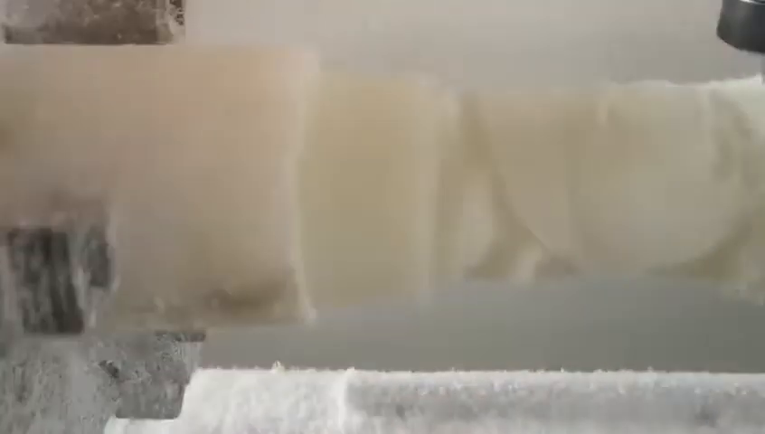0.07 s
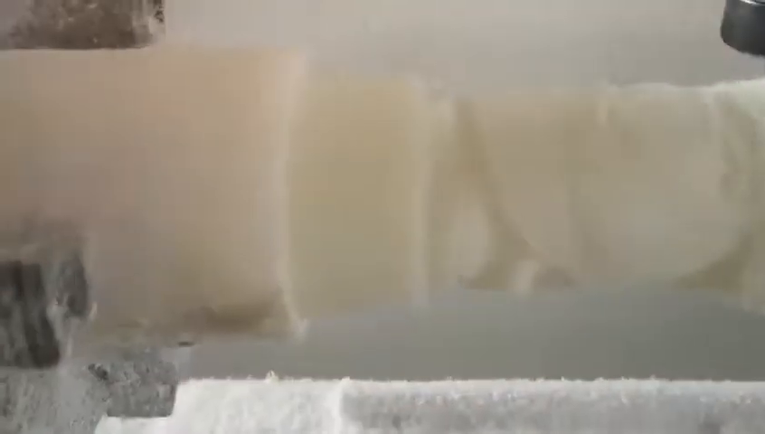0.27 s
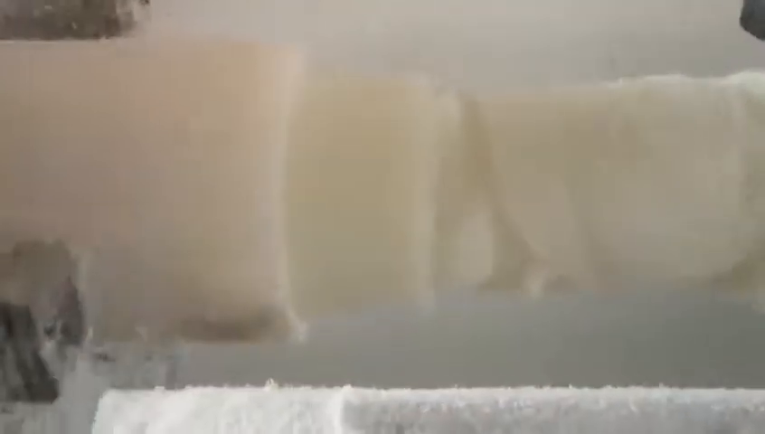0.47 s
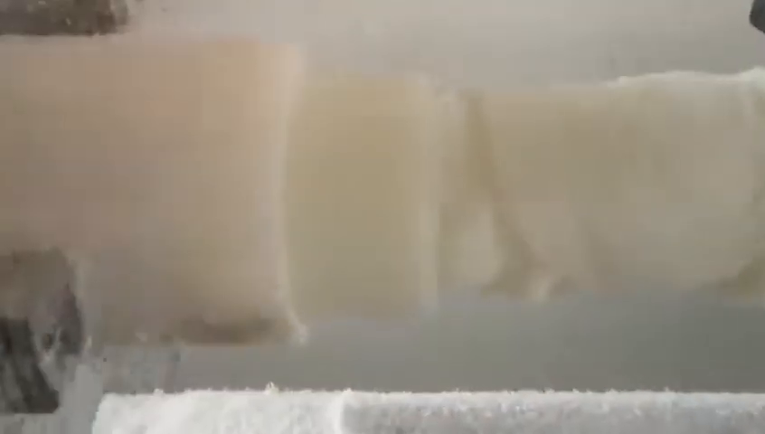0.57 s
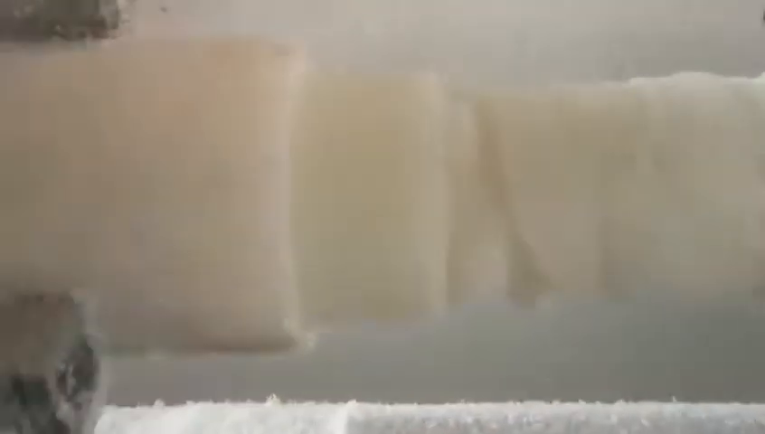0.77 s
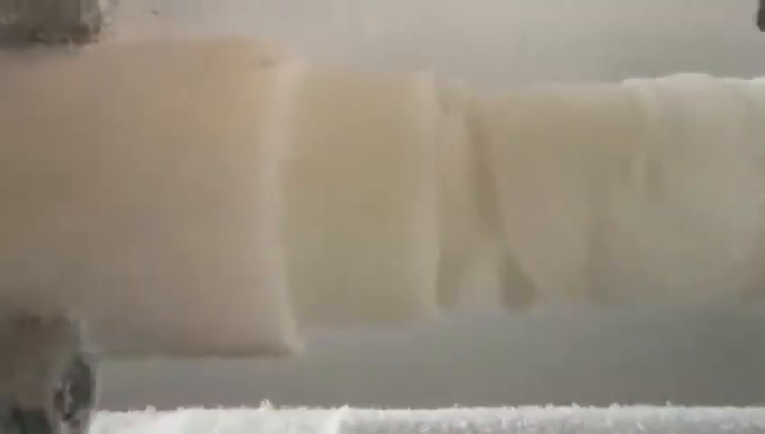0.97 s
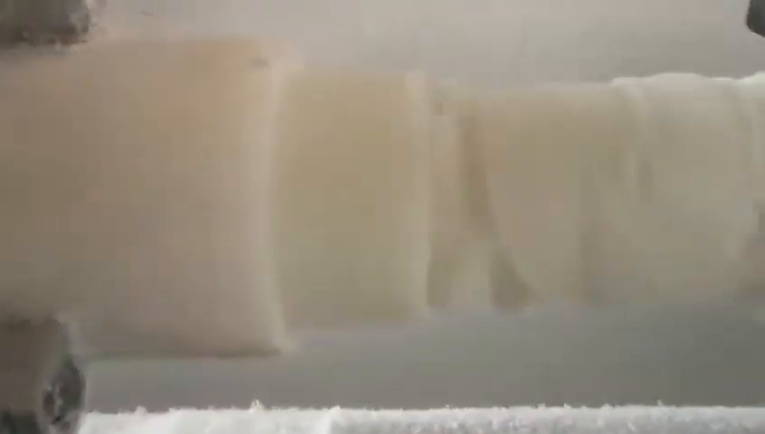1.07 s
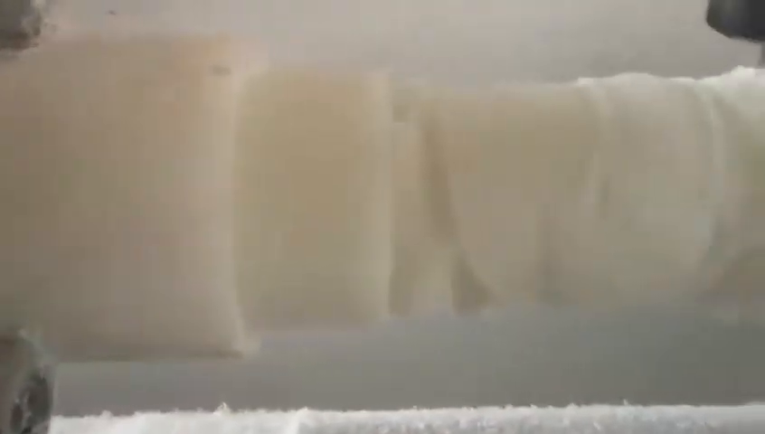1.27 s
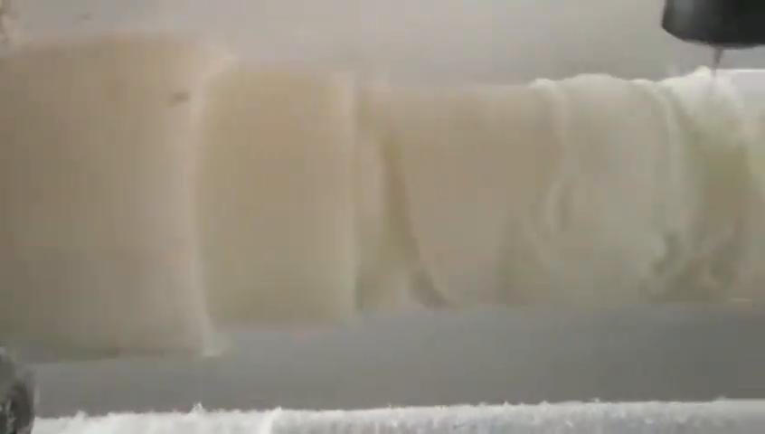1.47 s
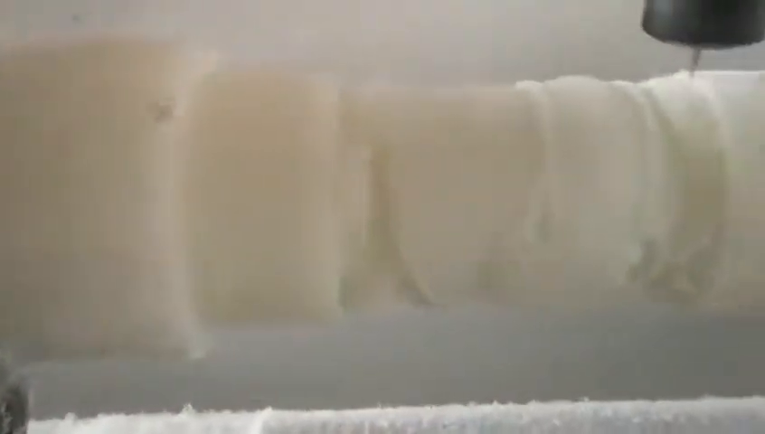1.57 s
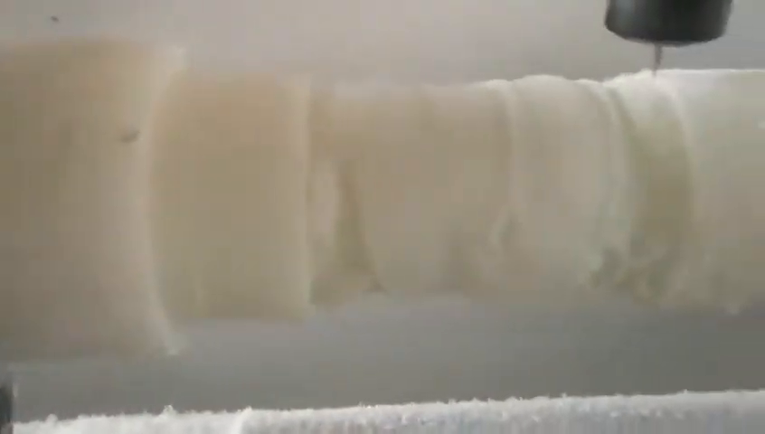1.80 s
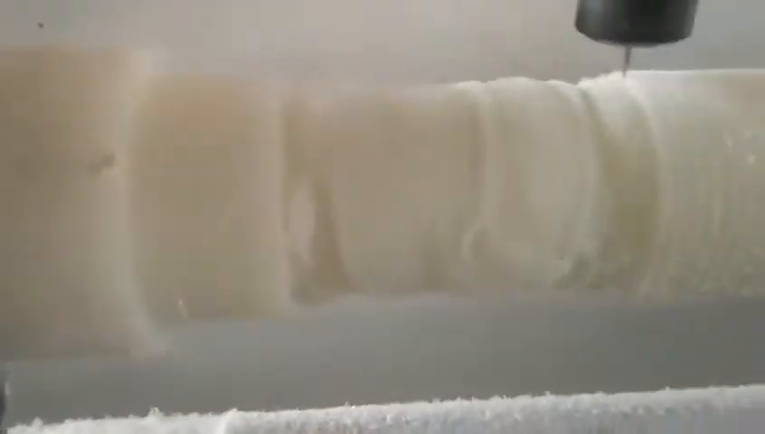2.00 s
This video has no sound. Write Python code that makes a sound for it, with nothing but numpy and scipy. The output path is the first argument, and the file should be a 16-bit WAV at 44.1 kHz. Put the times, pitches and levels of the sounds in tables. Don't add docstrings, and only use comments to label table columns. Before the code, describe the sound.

A router spindle whines on one fixed pitch near 800 hertz, with thin higher whines, as its bit cuts a turning foam cylinder. Dense, bright, slightly fluttering hiss stays even from 0 to 2 seconds. The main tone weakens from 0.5, nearly sinks at 1.15, then swells back by 1.6. Soft low motor hum pulses, strongest around 0.5 to 0.75, over faint workshop rumble; wide stereo, slightly watery, compressed sound.

```python
import sys
import numpy as np
from scipy import signal
from scipy.fft import rfft, irfft, next_fast_len
from scipy.io import wavfile
from scipy.ndimage import uniform_filter1d

SR = 44100
rng = np.random.default_rng(int(sys.argv[2]) if len(sys.argv) > 2 else 0)


def master(y):
    cut = np.clip(np.atleast_2d(y).T, -1, 1)
    pcm = np.round(cut * 32767)
    wavfile.write(sys.argv[1], SR, pcm.astype(np.int16))


def magnitude_from_level(level_db):
    exponent = np.asarray(level_db, float) / 20
    return 10 ** exponent


N = 89919

TURN_HZ, CARRIER_HZ = 399.85, 5000.0
ORDERS = (1, 2, 3, 4, 5, 6, 7, 8, 9, 19, 20, 21, 22)
# left level in dB, right level in dB, phase by which left leads in rad.
ORDER_TONES = [(-40.5, -46.5, -1.25), (0, 2, 0), (-44, -44, 0.8), (-39, -34.5, 0.48), (-43, -31.5, -2.1),
               (-50, -42.5, 7.5), (-54, -48, -13), (-54, -46.5, 0), (-40.5, -52.5, 3), (-38, -51, -2.8),
               (-49, -51.5, 7.6), (-56, -66, -8.8), (-50, -56.5, -0.5)]
# left echo as a share of direct, right share,
# fade cycle in seconds, time left is weakest in seconds, time right is weakest in seconds.
ECHOES = [
    (0.15, 0.15, 2, 0.15, 1.67),
    (0, 0, 2, 0, 0),
    (0.035, 0.076, 1.4, 0, 0),
    (0, 0, 2, 0, 0),
    (0.046, 0.6, 1.75, .25, .1),
    (.3, 0.26, 1.2, .1, 1.8),
]
# time in seconds, level in dB, left minus right in dB.
FLUTE_TONE = [(0, -31.5, 1), (.15, -33, 3), (.35, -33, 3), (.5, -36.5, 7), (.65, -35.5, 7), (.8, -42, 7),
              (.95, -43, 6), (1.15, -48, -1), (1.27, -41, -2), (1.45, -38.5, 0), (1.55, -34.5, 0),
              (2.04, -31, 0)]
# time in seconds, level in dB.
BITE = [(0, -13.5), (.35, 1.5), (.45, -4), (.65, 1.5), (.95, -1.5), (1.15, 2), (1.25, 6), (1.57, 5),
        (1.64, -15), (1.85, -2.5), (2.04, -0.5)]
FLUTTER_HZ, FLUTTER_DB = 20.8, -24
WAVER_DB, HIGH_WAVER_DB, WAVER_RAD = 0.7, 3, 0.08

# left level in dB, right level in dB, left lead in rad.
DRIVE_TONES = [
    (-39, -45, -1.5),
    (-52, -36, 5.5),
    (-59.5, -64, -24.5),
    (-35.5, -51.5, -0.5),
    (-57, -55, 11.5),
    (-41.5, -35.5, -8.5),
]

# time in seconds, level in dB.
CUT_DEPTH = [(0, -23), (.12, -22.5), (.5, -23), (.8, -23.5), (.9, -23), (1.14, -23.5), (1.17, -23.5),
             (1.66, -23.5), (1.77, -25.5), (1.8, -22.5), (2.04, -24)]
# frequency in Hz, density in dB per Hz.
HISS_LEFT = [(600, -20.5), (800, -6), (1000, -17), (1600, -2.5), (2800, -1), (4000, 2.5), (7600, -10.5),
             (10000, -22.5)]
# frequency in Hz, density in dB per Hz.
HISS_RIGHT = [(600, -28), (800, -13), (1000, -12), (1600, -3.5), (2800, -1), (4000, 5), (7600, -8.5),
              (10000, -31.5)]
# centre in Hz, width in Hz, left gain in dB, right gain in dB.
FRAME = [(780, 38, 3, 3), (1596, 156, 5.5, 3.5), (1896, 53, -15, -13.5), (2190, 190, -0.5, 2.5),
         (2285, 178, 6, 10), (2470, 100, -6.5, 1), (2590, 220, -1.5, 5), (2720, 290, 5.5, 1.5),
         (4106, 110, -9.5, -17), (4800, 99, -2.5, 1.5), (7450, 920, 10, 9), (8370, 71, 6.5, -3.5),
         (8870, 130, 10, 7), (8790, 64, 2.5, 4)]
# frequency in Hz, left-right likeness from 0 to 1.
HISS_ALIKE = [(600, .05), (700, .3), (770, .95), (1400, .93), (1900, .8), (2300, .6), (4000, .55),
              (9000, .6)]
# frequency in Hz, phase by which left leads in rad.
HISS_LEAD = [(600, 0), (1640, .4), (1980, -.3), (2410, 1.9), (3010, .2), (3450, 2.8), (5430, 3.7),
             (9300, 15.8)]
HISS_DB, HISS_PATCHY_DB, HISS_SHARED_DB = 3.5, 2.5, 0.97
CHIPS_PER_S, CHIP_SPREAD_DB, FLUTE_DEPTH = 25000, 1.1, 0.12

# time in seconds, level in dB.
AXIS_EFFORT = [(0.0, -52), (0.04, -31.5), (0.19, -41), (0.47, -26), (0.59, -33.5), (0.65, -20), (0.71, -37),
               (0.75, -19.5), (0.8, -39), (0.92, -30.5), (1.0, -43.5), (1.07, -32.5), (1.12, -49.5),
               (1.17, -33.5), (1.29, -41.5), (1.83, -40), (1.86, -26.5), (2.04, -33.5)]
HUM_HZ, HUM_WIDTH_HZ, HUM_DB = 134, 22, -1

# frequency in Hz, density in dB per Hz.
RUMBLE = [(20, 2.5), (32, -11.5), (53, 2.5), (75, -7), (172, -4.5), (226, -12.5), (380, -14), (620, -27)]
# frequency in Hz, left-right likeness from 0 to 1.
RUMBLE_ALIKE = [(20, 1), (60, 1), (200, .996), (300, .7), (400, .2), (620, 0)]
RUMBLE_DB, RUMBLE_PATCHY_DB = -33, 2.8

# frequency in Hz, share of time lost in the sum, share in the difference.
NULLS = [(20, 0, .9), (200, 0, .8), (300, .05, .1), (550, .35, .2), (750, .15, .6), (1400, .15, .5),
         (2000, .1, .14), (3500, .25, .2), (5000, .3, .22), (7000, .25, .3), (8300, .4, .4),
         (9700, .55, .55)]
# frequency in Hz, level in dB against neighbours below which a line
WEAK = [(300, -30), (600, -7), (2000, -7), (5000, -5), (8000, -4), (8400, 1)]
# start in seconds, length in seconds, centre in Hz, width in Hz.
HOLES = [(.21, .14, 5450, 250), (.3, .05, 5200, 300), (.95, .03, 5000, 500), (1.05, .03, 4950, 400),
         (1.11, .04, 4000, 350), (1.6, .1, 3600, 150), (1.74, .03, 3600, 300), (.29, .06, 560, 220),
         (.81, .08, 630, 90), (1.0, .06, 610, 110), (1.14, .1, 620, 90), (1.24, .08, 580, 130),
         (1.73, .08, 560, 200), (1.95, .05, 590, 180)]
# start in seconds, length in seconds, edge in Hz.
SUM_TOP = [(.395, .025, 8250), (.575, .03, 8250), (.63, .05, 9750), (.69, .06, 8250), (.83, .06, 8600),
           (.92, .04, 9600), (.98, .02, 9750), (1.14, .12, 9700), (1.485, .1, 8250), (1.64, .06, 8600),
           (1.8, .02, 8250), (1.82, .04, 9750), (1.905, .04, 8600), (1.975, .03, 8100)]
# start in seconds, length in seconds, edge in Hz.
DIFFERENCE_TOP = [(.03, .05, 8300), (.2, .06, 8300), (.53, .03, 8300), (.63, .05, 9750), (.68, .04, 8300),
                  (.83, .03, 8300), (.9, .07, 9500), (.98, .07, 8350), (1.12, .02, 8300), (1.15, .11, 9700),
                  (1.26, .04, 8300), (1.35, .045, 8100), (1.83, .07, 9750), (1.91, .02, 8300)]
NULL_FRAMES, STANDOUT_DB, TOP_HZ, SMEAR_S = 5, 8.0, 9030, 0.014


def rms_one(x):
    return x / np.sqrt(np.mean(x ** 2) + 1e-20)


def in_time(rows):
    return np.interp(np.arange(N) / SR, *np.transpose(rows))


def at_hz(points, hz):
    table_hz, value = np.transpose(points)
    return np.interp(np.log(hz + 1), np.log(table_hz), value)


def drift(rate_hz):
    r = np.exp(-80 * np.pi * rate_hz / SR)
    noise = rng.standard_normal(N // 40 + 2002)
    slow = signal.lfilter([1], [1, -2 * r, r * r], noise)[2000:]
    return np.interp(np.arange(N) / 40, np.arange(len(slow)), rms_one(slow - slow.mean()))


def tone(hz, left_db, right_db, lead_rad, waver_db):
    phase = 2 * np.pi * (hz * np.arange(N) / SR + rng.random())
    phase = phase + WAVER_RAD * hz / TURN_HZ * drift(9.2)
    db = np.array([left_db + waver_db * drift(3), right_db + waver_db * drift(3)])
    return np.sqrt(2) * magnitude_from_level(db) * np.exp(1j * (phase + np.array([[lead_rad], [0]])))


def pair(source, colour_db, alike, lead_rad, band_hz, patchy_db):
    size = next_fast_len(N)
    hz = np.arange(size // 2 + 1) * SR / size
    both, left, right = rfft(source, size)
    alike = np.clip(at_hz(alike, hz), 0, 1)
    both = np.sqrt(alike) * both
    own = np.sqrt(1 - alike)
    left = both * np.exp(1j * lead_rad(hz)) + own * left
    right = both + own * right
    spectra = magnitude_from_level(colour_db(hz)) * np.array([left, right])
    place = np.interp(np.log(hz + 1), np.log(band_hz), np.arange(len(band_hz)))
    out = 0
    for k in range(len(band_hz)):
        share = np.clip(1.5 - 2 * abs(place - k), 0, 1)
        out = out + magnitude_from_level(patchy_db * drift(15.6)) * irfft(share * spectra, size)[:, :N]
    return rms_one(out)


def spindle():
    t = np.arange(N) / SR
    flutter = 1 + magnitude_from_level(FLUTTER_DB) * np.exp(2j * np.pi * FLUTTER_HZ * t)
    out = 0
    for k, (order, row) in enumerate(zip(ORDERS, ORDER_TONES)):
        low = k < len(ECHOES)
        sound = tone(order * TURN_HZ, *row, WAVER_DB if low else HIGH_WAVER_DB) * flutter
        if low:
            left_share, right_share, cycle_s, left_weakest_s, right_weakest_s = ECHOES[k]
            share = np.array([[left_share], [right_share]])
            weakest_s = np.array([[left_weakest_s], [right_weakest_s]])
            sound = sound * (1 - share * np.cos(2 * np.pi * (t - weakest_s) / cycle_s))
        if order == 2:
            s, db, pan_db = np.transpose(FLUTE_TONE)
            half_pan_db = np.interp(t, s, pan_db) / 2 * np.array([[1], [-1]])
            sound = sound[1] * magnitude_from_level(np.interp(t, s, db) + half_pan_db)
        if order in (3, 4):
            sound = sound * magnitude_from_level(in_time(BITE))
        out = out + sound.real
    return out


def drive():
    out = 0
    for k, row in enumerate(DRIVE_TONES):
        out = out + tone(CARRIER_HZ + (k - 2) * TURN_HZ, *row, HIGH_WAVER_DB / 2).real
    return out


def hiss_colour_db(hz):
    db = np.array([at_hz(HISS_LEFT, hz), at_hz(HISS_RIGHT, hz)]) - 60 * (hz < 500)
    for peak_hz, width_hz, left_db, right_db in FRAME:
        db = db + np.array([[left_db], [right_db]]) / (1 + (2 * (hz - peak_hz) / width_hz) ** 2)
    return db


def hiss_lead_rad(hz):
    return np.interp(hz, *np.transpose(HISS_LEAD))


def cut():
    flute = 1 + FLUTE_DEPTH * np.cos(2 * np.pi * TURN_HZ * np.arange(N) / SR)
    size_db = CHIP_SPREAD_DB * np.minimum(rng.exponential(1, (3, N)), 4)
    sizes = magnitude_from_level(size_db) * rng.standard_normal((3, N))
    chips = sizes * (rng.random((3, N)) < CHIPS_PER_S / SR) * flute
    bands = np.geomspace(550, 9700, num=84)
    hiss = pair(chips, hiss_colour_db, HISS_ALIKE, hiss_lead_rad, bands, HISS_PATCHY_DB)
    return magnitude_from_level(in_time(CUT_DEPTH) + HISS_DB + HISS_SHARED_DB * drift(11.0)) * hiss


def axis_hum():
    r = np.exp(-np.pi * HUM_WIDTH_HZ / SR)
    x = rng.standard_normal(N + SR)
    for _ in range(2):
        x = signal.lfilter([1, 0, -1], [1, -2 * r * np.cos(2 * np.pi * HUM_HZ / SR), r * r], x)
    steady = np.cos(np.angle(signal.hilbert(x)))
    return magnitude_from_level(in_time(AXIS_EFFORT) + HUM_DB) * rms_one(steady[SR:])


def rumble_colour_db(hz):
    return at_hz(RUMBLE, hz) - 60 * ((hz > 700) | (hz < 15))


def rumble():
    noise = rng.standard_normal((3, N))
    bands = np.geomspace(20, 650, num=14)
    shake = pair(noise, rumble_colour_db, RUMBLE_ALIKE, np.zeros_like, bands, RUMBLE_PATCHY_DB)
    return magnitude_from_level(RUMBLE_DB) * shake


def dropouts(x):
    hz, t, z = signal.stft([x[0] + x[1], x[0] - x[1]], SR, nperseg=2048, noverlap=1536)
    band = (30 * np.arcsinh(hz / 2600)).astype(int)
    chance = rng.standard_normal((2, band[-1] + 1, len(t)))
    chance = uniform_filter1d(chance, size=NULL_FRAMES, axis=2)
    rank = chance.argsort(axis=2).argsort(axis=2)[:, band] / len(t)
    share = np.array([at_hz(np.array(NULLS)[:, [0, k]], hz) for k in (1, 2)])
    log_mean = np.log(abs(z).mean(axis=2) + 1e-12)
    usual = np.exp(uniform_filter1d(log_mean, size=25, axis=1))[..., None]
    lost = (rank < share[..., None]) & (abs(z) < magnitude_from_level(STANDOUT_DB) * usual)
    lost |= abs(z) < magnitude_from_level(at_hz(WEAK, hz))[:, None] * usual
    for s, length, hole_hz, width_hz in HOLES:
        in_band = (abs(hz - hole_hz) < width_hz / 2)[:, None]
        lost[0] |= in_band & (t > s - SMEAR_S) & (t < s + length + SMEAR_S)
    for k, moves in enumerate((SUM_TOP, DIFFERENCE_TOP)):
        edge_hz = np.full(len(t), TOP_HZ)
        for s, length, moved_hz in moves:
            spread = SMEAR_S * np.sign(TOP_HZ - moved_hz)
            edge_hz[(t > s - spread) & (t < s + length + spread)] = moved_hz
        lost[k] |= hz[:, None] > edge_hz
    total, difference = signal.istft(z * ~lost, SR, nperseg=2048, noverlap=1536)[1][:, :N]
    return np.array([total + difference, total - difference]) / 2


def scene():
    return spindle() + drive() + cut() + rumble() + axis_hum()


def band_limit(x):
    return signal.sosfilt(signal.butter(12, 9730, fs=SR, output="sos"), x)


def record(dry):
    mix = dropouts(dry)
    return band_limit(mix)


dry = scene()
out = record(dry)
master(out)
```